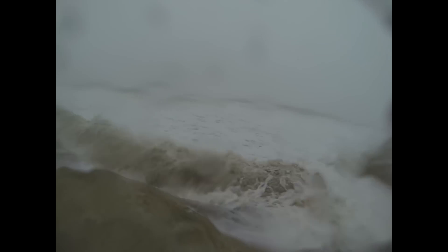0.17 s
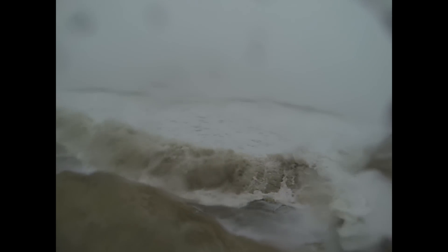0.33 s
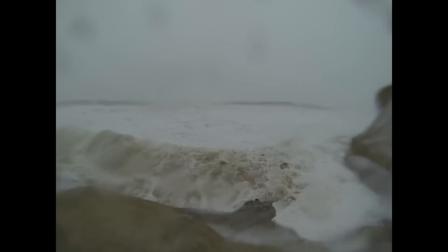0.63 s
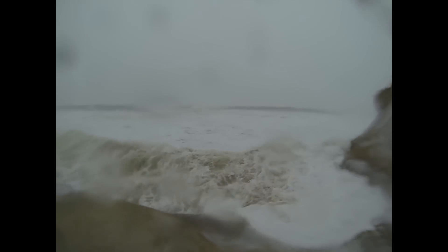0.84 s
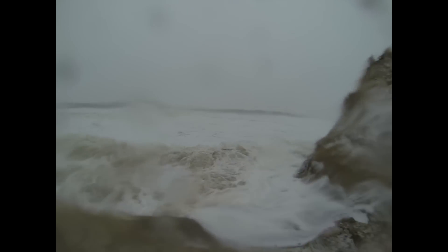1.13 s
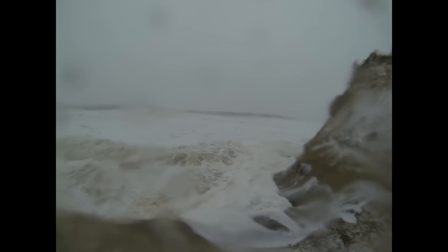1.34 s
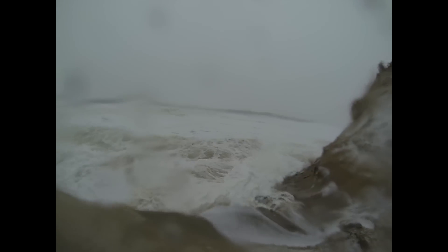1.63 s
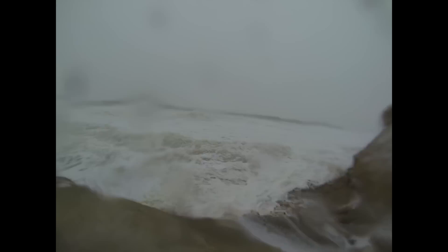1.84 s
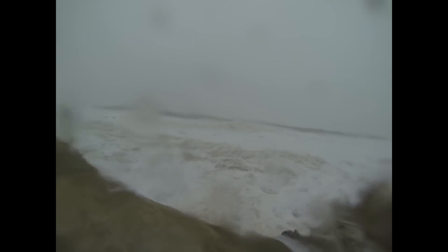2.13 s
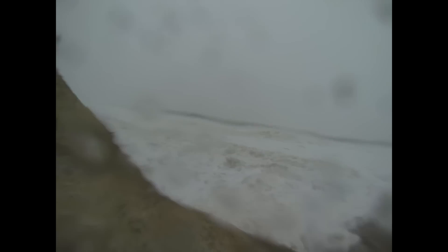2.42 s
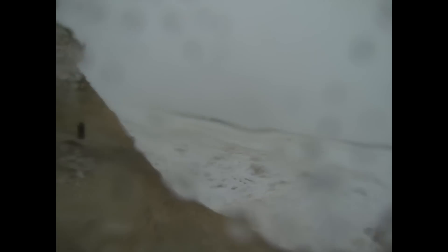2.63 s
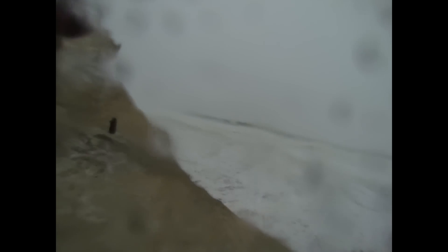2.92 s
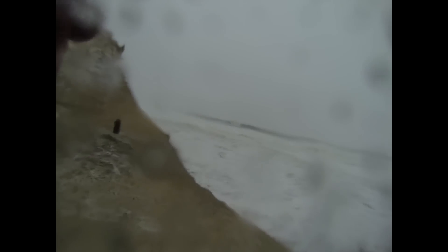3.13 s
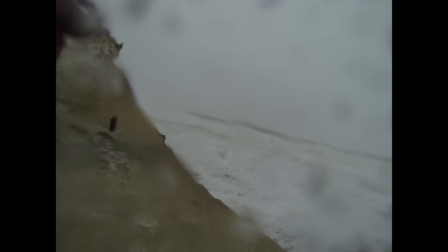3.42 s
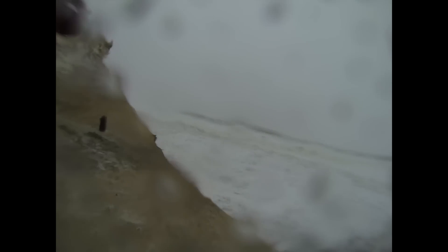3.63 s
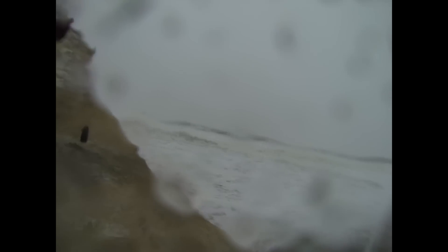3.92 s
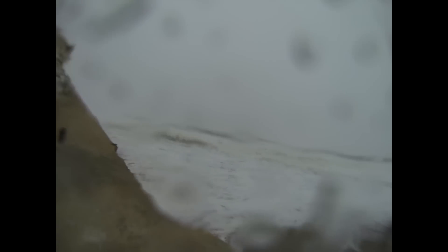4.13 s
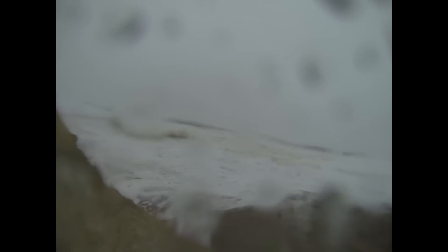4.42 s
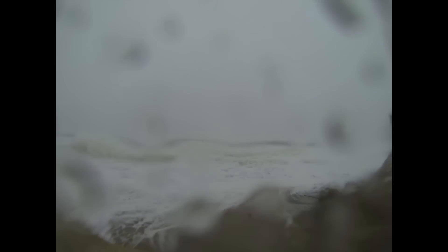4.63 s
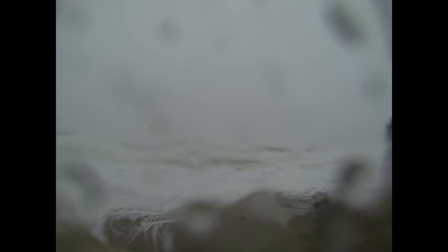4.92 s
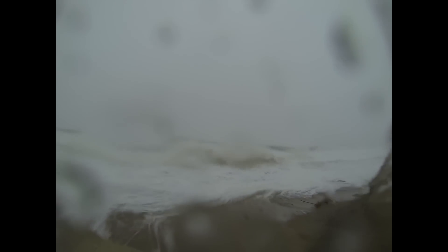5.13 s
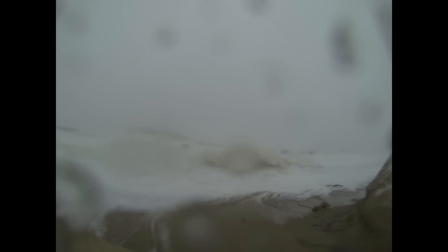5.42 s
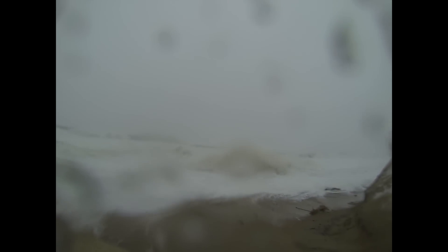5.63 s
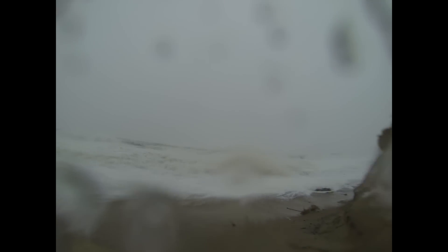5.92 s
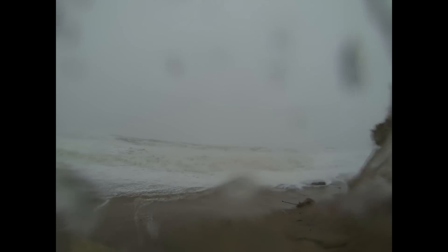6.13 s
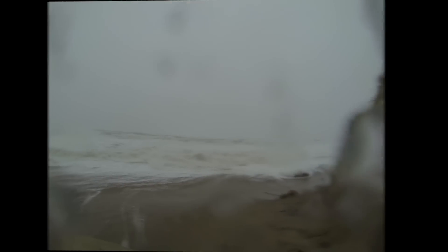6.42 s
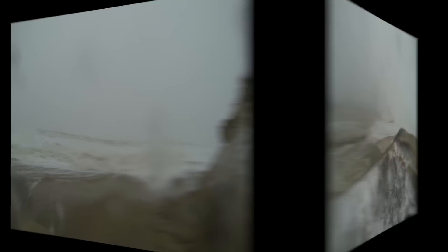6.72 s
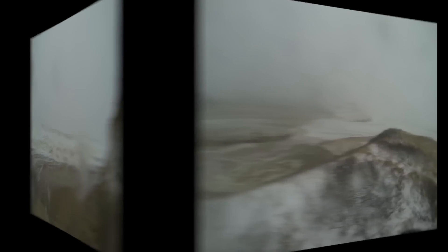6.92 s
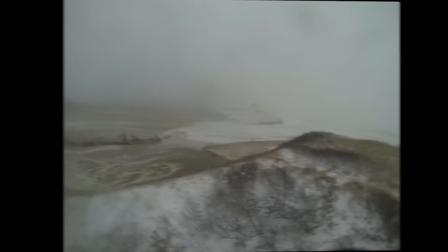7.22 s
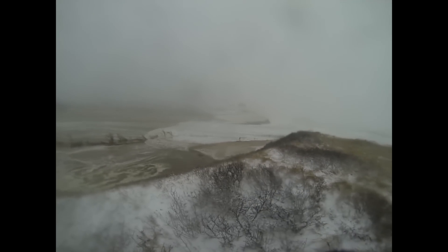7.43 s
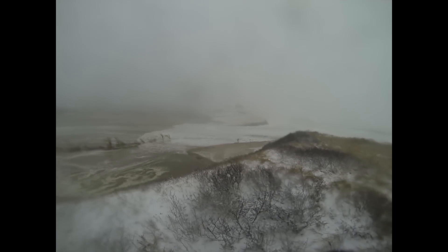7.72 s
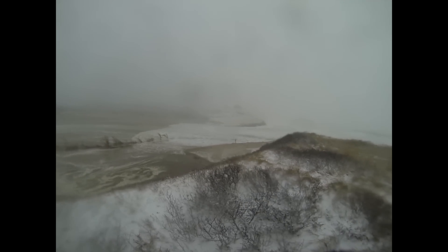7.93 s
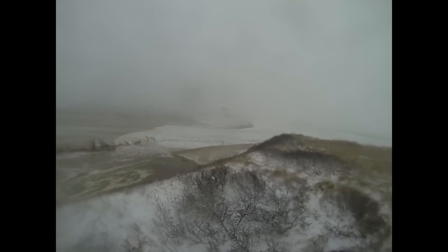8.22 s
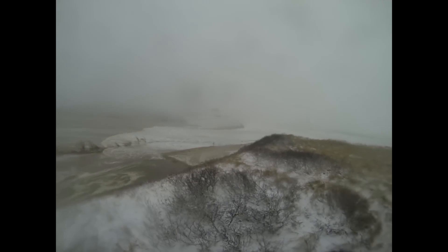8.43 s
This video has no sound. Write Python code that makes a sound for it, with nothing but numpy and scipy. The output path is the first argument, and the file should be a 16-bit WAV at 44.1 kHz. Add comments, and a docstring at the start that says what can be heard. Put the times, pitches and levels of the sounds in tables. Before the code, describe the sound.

Close, exposed outdoor microphone in a gale: bassy, lumpy wind noise and short bursts of airy roar. Hard bright ticks and fine patter strike the plastic shell, first in loose clusters, then a dense rattling spell near the three-second mark, then sparse isolated taps. Rough surf stays behind as a boxy wash with faint steady hiss. No voices.

```python
"""Storm on a beach

A small hand-held camera hears gusts buffet its microphone port: rumble, throb and flutter of shaped noise.
Blown spray and sleet tick on the plastic housing, as lone hard pellets and as a fine patter that thickens
in short puffs; each hit is a noise burst ringing the housing modes, and heavy drops add a dull thud.
Behind them surf roars, as noise lifted at the housing resonances, over a steady hiss of far foam."""
import sys
import numpy as np
from scipy import signal
from scipy.fft import rfft, irfft
from scipy.io import wavfile

SR = 44100
rng = np.random.default_rng(int(sys.argv[2]) if len(sys.argv) > 2 else 0)


def linear_from_db(decibels):
    """Turn decibels (scalar or array-like) into linear amplitude factors; 0 gives 1."""
    return 10 ** (np.asarray(decibels, float) / 20)


def inscribe(sig):
    """Save sig as 16-bit PCM at rate SR to the path in sys.argv[1].

    A 1-D sig is mono; a 2-D sig holds one channel per row.
    Samples are clipped to [-1, 1] before scaling.
    """
    pcm = np.round(np.clip(np.atleast_2d(sig).T, -1, 1) * 32767)
    wavfile.write(sys.argv[1], SR, pcm.astype(np.int16))


N = 377496


def rms_one(x):
    """Scale to rms 1."""
    return x / np.sqrt(np.mean(x ** 2) + 1e-20)


def in_time(rows):
    """Columns of a curve table, one value per sample."""
    s, *columns = np.transpose(rows)
    return [np.interp(np.arange(N) / SR, s, column) for column in columns]


def at_hz(points, hz):
    """Read a spectrum on a log-frequency axis."""
    point_hz, level_db = np.transpose(points)
    return np.interp(np.log(hz), np.log(point_hz), level_db)


def drift(rate_hz):
    """Slow random wander of spread 1: noise twice through a one-pole low-pass at rate_hz."""
    step = 40     # samples between computed points
    pole = np.exp(-2 * np.pi * rate_hz * step / SR)
    noise = rng.standard_normal(N // step + 2002)
    slow = signal.lfilter([1], [1, -2 * pole, pole * pole], noise)[2000:]     # drop the settling start
    return np.interp(np.arange(N) / step, np.arange(len(slow)), rms_one(slow))


def coloured(spectrum):
    """Noise with the given spectrum, rms 1."""
    hz = np.maximum(np.arange(N // 2 + 1) * SR / N, 1)
    white = rfft(rng.standard_normal(N))
    return rms_one(irfft(white * linear_from_db(at_hz(spectrum, hz)), N))


def resonate(x, hz, width_hz):
    """Two-pole resonance; a unit click rings with height about 1."""
    r, w = np.exp(-np.pi * width_hz / SR), 2 * np.pi * hz / SR
    return signal.lfilter([0, np.sin(w)], [1, -2 * r * np.cos(w), r * r], x + 1e-18)


# short puffs that fling a sheet of spray at the camera: middle_s, length_s, flutter_db, roar_db, patter_db
PUFFS = [(0.05, 0.14, -60, -50.5, -58.5), (0.208, 0.059, -55, -56, -54), (0.432, 0.086, -60, -49, -50),
         (0.656, 0.18, -39.5, -43.5, -44.5), (0.863, 0.18, -35.5, -42.5, -54),
         (1.482, 0.091, -62, -63, -53.5), (1.702, 0.062, -48, -53, -58), (2.018, .12, -43.5, -47, -47),
         (2.124, 0.038, -49, -42, -47), (2.409, 0.048, -38, -48, -36.5), (2.559, 0.13, -48, -46.5, -36),
         (2.863, 0.16, -36, -42.5, -34.5), (2.99, 0.062, -37, -47, -42), (3.192, 0.12, -56, -45, -39),
         (3.27, .12, -37.5, -42.5, -43.5), (3.39, 0.088, -47.5, -47.5, -50),
         (3.713, 0.067, -42, -50.5, -53), (3.816, 0.046, -46, -43, -42), (3.906, 0.088, -39, -45, -42.5),
         (4.058, 0.21, -50.5, -56, -50.5), (4.194, 0.091, -61, -52, -59.5), (4.348, 0.053, -54, -72, -53),
         (4.503, 0.045, -61, -60, -54.5), (4.707, .06, -53, -59, -63), (4.767, 0.037, -49, -56, -57.5),
         (4.845, 0.051, -53, -57, -57.5), (5.728, 0.16, -43.5, -52, -70.5), (5.982, 0.15, -47, -58, -67),
         (6.099, 0.13, -45, -52, -61), (6.283, 0.13, -45.5, -51.5, -74), (6.423, 0.081, -39.5, -48.5, -77),
         (6.546, 0.076, -46, -52.5, -74), (6.688, 0.23, -43.5, -51, -58.5), (7.002, 0.094, -50.5, -57, -63),
         (7.164, 0.13, -50, -51.5, -60.5), (7.636, 0.12, -42, -49.5, -59.5),
         (7.858, 0.075, -55, -54, -55.5), (7.97, 0.064, -42, -48, -56), (8.049, 0.11, -45.5, -51.5, -56.5),
         (8.374, .05, -51, -53.5, -73), (8.482, 0.075, -45, -49.5, -58.5)]


def puffed(slow_db, column):
    """Add the power of each puff, a raised-cosine swell, to a slow level."""
    t, power = np.arange(N) / SR, linear_from_db(2 * slow_db)
    for row in PUFFS:
        middle_s, length_s = row[:2]
        phase = np.pi * np.clip((t - middle_s) / (2 * length_s), -.5, .5)
        power = power + linear_from_db(2 * row[column]) * np.cos(phase) ** 4
    return 10 * np.log10(power)


# slow strength of the wind on the port: start_s, flutter_db, rumble_db
GUST = [(0.0, -51.5, -34), (0.62, -52, -28), (0.76, -43, -33), (0.9, -47, -23), (1.26, -56.5, -33.5),
        (1.91, -54, -38.5), (2.14, -52, -32.5), (2.17, -47, -35.5), (2.79, -42, -30.5), (2.95, -49, -22),
        (3.07, -36, -32), (3.27, -55, -21), (3.43, -53, -29.5), (3.65, -54, -43), (3.86, -42.5, -29),
        (4.05, -53, -41), (4.27, -54, -35.5), (5.2, -54, -40.5), (5.58, -49, -34.5), (6.56, -49.5, -33),
        (6.6, -51, -44), (6.75, -53, -31), (6.94, -52.5, -41), (7.22, -55, -33.5), (7.48, -58.5, -39),
        (7.68, -56, -28), (7.87, -48.5, -32), (8.08, -53, -31), (8.34, -59, -44), (8.56, -55, -37)]
# wind noise spectra, each pitch_hz, level_db (per Hz, relative)
RUMBLE = [(8, 3.5), (25, 3.5), (40, 8.5), (67, -17.5), (110, -27), (200, -27.5), (2000, -140)]
THROB = [(30, -30), (60, 7.5), (90, -1.5), (140, -15.5), (300, -58), (2000, -140)]
FLUTTER = [(50, -4.5), (100, 1), (200, -5.5), (400, -17), (700, -36.5), (1500, -46), (8000, -120)]
BUFFET_DB, BUFFET_RATE_HZ = 1.5, 9.0     # the gust comes in lumps


def wind():
    """Eddies over the port: deep rumble, faster flutter, and between them a throb that needs both."""
    flutter_db, rumble_db = in_time(GUST)
    lumps_db = BUFFET_DB * drift(BUFFET_RATE_HZ)
    rumble_db = rumble_db + lumps_db
    flutter_db = puffed(flutter_db + 0.24 * lumps_db, column=2)
    rumble = linear_from_db(rumble_db) * coloured(RUMBLE)
    throb = linear_from_db((rumble_db + flutter_db) / 2 - 2.5) * coloured(THROB)
    flutter = linear_from_db(flutter_db) * rms_one(linear_from_db(0.99 * drift(15.5)) * coloured(FLUTTER))
    return rumble + throb + flutter


# housing resonances: pitch_hz, width_hz, level_db (relative, how readily a hit rings the mode)
HOUSING = [(837, 156, -32), (1554, 326, -1), (2080, 650, 4), (3540, 592, 4.5), (4865, 690, 7),
           (6306, 337, -2.5), (7470, 585, 2), (10560, 980, -17), (10300, 400, -28.5), (11990, 5200, 8),
           (14200, 1200, -24)]


def strike(at, peak_db, colour_db, scatter_db, contact_s):
    """Each impact is a short crumbling burst that rings every housing mode with a strength of its own."""
    taps = np.arange(96)
    # contact varies from hit to hit: wet drops splat longer than ice
    lasts_s = contact_s * linear_from_db(4.7 * rng.standard_normal((len(at), 1)))
    burst = rng.standard_normal((len(at), len(taps))) * np.exp(-taps / (lasts_s * SR))
    luck_db = scatter_db * rng.standard_normal((len(at), len(HOUSING)))
    least_drive = .5 * np.sqrt(np.sum(burst ** 2, axis=1))
    out = np.zeros(N)
    for k, (hz, width_hz, level_db) in enumerate(HOUSING):
        drive = np.abs(burst @ np.exp(2j * np.pi * hz * taps / SR))     # how hard the burst drives this mode
        drive = np.maximum(drive, least_drive)
        gain = linear_from_db(peak_db + level_db + colour_db(hz) + luck_db[:, k]) / drive
        force = np.bincount((at[:, None] + taps).ravel(), (gain[:, None] * burst).ravel(), N + len(taps))
        out += (-1) ** k * resonate(force[:N], hz, width_hz)     # neighbouring modes in opposite sign
    return out


# lone hard pellets: start_s, body_db (peak of the body modes), pitch_hz (the body modes gather round it),
# treble_db (peak of the treble modes)
PELLETS = [(0.0192, -13, 1990, -26), (0.0443, -16.5, 4160, -21), (0.1088, -23.5, 1580, -47),
           (0.1837, -26, 2380, -32.5), (0.315, -40, 3060, -44), (0.414, -16.5, 3700, -22),
           (0.433, -12.5, 3500, -23), (0.466, -20.5, 3700, -31), (0.49, -21, 2500, -19),
           (0.5296, -25, 3450, -27), (0.555, -21, 2810, -28), (0.579, -20, 3720, -26),
           (0.6419, -11.5, 2120, -18.5), (0.6847, -13, 1890, -18), (0.703, -25, 3080, -13.5),
           (0.7756, -26, 3040, -20), (0.8078, -21, 3800, -24), (0.842, -18, 3700, -21),
           (0.9526, -26, 2760, -25.5), (1.0035, -25, 3800, -26.5), (1.328, -30, 1950, -35),
           (1.4443, -25, 3380, -28), (1.459, -24, 3860, -40), (1.553, -29, 2760, -29),
           (1.5706, -12, 3500, -17), (1.592, -28, 2940, -49), (1.651, -19, 3620, -39),
           (1.73, -24, 1760, -48), (1.9124, -28, 3050, -24), (1.941, -25, 3600, -18),
           (1.9596, -20.5, 3450, -43), (1.9794, -16.5, 3670, -21), (2.0449, -7.5, 3800, -12.5),
           (2.0578, -12.5, 3820, -21), (2.0617, -8, 2900, -15), (2.2274, -13, 3770, -39),
           (2.2662, -12.5, 3180, -21), (2.2784, -8.5, 2090, -40), (2.349, -15.5, 3880, -25),
           (2.3715, -15.5, 4040, -30), (2.4122, -16.5, 3840, -21), (2.5853, -14, 4060, -24),
           (2.662, -13, 2340, -15.5), (2.689, -15.5, 2560, -12), (2.7206, -14, 2340, -15.5),
           (2.76, -14, 2500, -4.5), (2.8018, -15, 3890, -10), (3.0063, -14, 4080, -21),
           (3.0685, -15.5, 3140, -9.5), (3.144, -14, 3600, -18.5), (3.198, -13.5, 2640, -8.5),
           (3.2815, -12, 2750, -17), (3.3179, -14, 2900, -15), (3.4288, -32, 2320, -29),
           (3.5335, -25, 3030, -37), (3.5783, -9, 2450, -20), (3.658, -14.5, 2480, -20),
           (3.6727, -16, 2470, -20), (3.7397, -17.5, 1970, -32), (3.7625, -20, 2500, -39),
           (3.7958, -24, 3050, -21), (3.81, -25, 2500, -21), (4.0383, -35, 2460, -27.5),
           (4.165, -14.5, 2560, -39), (4.2153, -22.5, 2230, -25), (4.2752, -13.5, 3520, -38),
           (4.321, -28, 3800, -47), (4.4205, -27, 2640, -47), (4.658, -36.5, 1900, -34.5),
           (4.7677, -25, 2360, -42), (4.9117, -32, 3100, -36), (5.545, -31.5, 3970, -45),
           (5.6582, -25.5, 1760, -35), (6.354, -18.5, 2660, -33), (7.1446, -25, 2360, -49),
           (7.5219, -27.5, 4730, -38), (7.9809, -21.5, 2720, -30), (8.3725, -29.5, 2010, -37.5),
           (8.452, -18.5, 1480, -35)]
TREBLE_FROM_HZ = 5500
OFF_PITCH_DB_PER_OCTAVE = 14     # body modes far from a pellet's pitch speak less


def pellets(rows):
    """Hard hits; where a pellet lands decides its pitch in the body and how much treble it wakes."""
    s, body_db, pitch_hz, treble_db = np.transpose(rows)
    mode_hz, _, level_db = np.transpose(HOUSING)
    body = mode_hz < TREBLE_FROM_HZ

    def off_db(hz):
        return -OFF_PITCH_DB_PER_OCTAVE * np.abs(np.log2(hz / pitch_hz))

    body_power = sum(linear_from_db(2 * (db + off_db(hz))) for hz, db in zip(mode_hz[body], level_db[body]))
    body_sum_db = 10 * np.log10(body_power)
    treble_sum_db = 10 * np.log10(np.sum(linear_from_db(2 * level_db[~body])))

    def colour_db(hz):
        if hz < TREBLE_FROM_HZ:
            return body_db + off_db(hz) - body_sum_db
        return treble_db - treble_sum_db

    at = np.round(s * SR).astype(int)
    wait = (rng.uniform(.003, .012, len(at)) * SR).astype(int)
    later = np.minimum(at + wait, N - 1)     # a splinter falls back
    hits = strike(at, 0, colour_db, scatter_db=1.5, contact_s=0.00043)
    splinters = strike(later, -26.5, colour_db, scatter_db=4.5, contact_s=0.00028)
    return hits + splinters


CANDIDATE_STRAYS_PER_S = 160
STRAY_SHARE, STRAY_CLUMP_DB = .4, 6.0     # share that lands, and how much they bunch
STRAY_DB, STRAY_SPREAD_DB = -39.5, 3     # smallest stray at average patter, and size scale above it
STRAY_FOLLOWS = 0.76     # dB per dB of patter


def strays(patter_db):
    """Smaller pellets in random bunches, harder where the spray is thick; rows as in PELLETS."""
    at = np.flatnonzero(rng.random(N) < CANDIDATE_STRAYS_PER_S / SR)
    size, pitch, bright, luck = rng.random((len(at), 4)).T
    db = STRAY_DB + STRAY_FOLLOWS * (patter_db[at] - patter_db.mean())
    db = db - STRAY_SPREAD_DB * np.log(1 - .95 * size)
    lands = luck < STRAY_SHARE * linear_from_db(STRAY_CLUMP_DB * drift(15.0))[at]
    db = np.where(lands, db, -np.inf)
    return np.transpose([at / SR, db, 1700 * 2 ** (1.3 * pitch), db - 17.3 * bright])


CANDIDATE_DROPS_PER_S = 3000
PATTER_SPREAD_DB = 6.5     # scale of the exponential drop sizes
DENSEST_AT_DB, THINNING = -44, 0.64     # below this level the drop rate falls, THINNING dB (20 log10) per dB


def patter(patter_db):
    """Fine spray: small hits in clumps, a dense fizz in the gusts and scattered ticks between them."""
    at = np.flatnonzero(rng.random(N) < CANDIDATE_DROPS_PER_S / SR)
    share = np.clip(linear_from_db(THINNING * (patter_db - DENSEST_AT_DB)), .02, 1)
    lands = rng.random(len(at)) < (share * linear_from_db(4.0 * drift(20)))[at]
    size_db = PATTER_SPREAD_DB * np.minimum(rng.exponential(1, len(at)), 3.0)
    lean_db = 2.0 * rng.standard_normal(len(at))     # brighter or duller, per octave

    def colour_db(hz):
        return (lean_db - 0.2) * np.log2(hz / 4000)

    hits = strike(at, np.where(lands, size_db, -np.inf), colour_db, scatter_db=1.0, contact_s=0.000078)
    even = hits / np.sqrt(share)     # sparse drops made stronger, so density alone does not set the level
    return linear_from_db(patter_db) * rms_one(even)


# heavy drops that also shake the whole camera: start_s, ring_db (lowest housing mode), thud_db
HEAVY = [(1.7305, -38, -23), (2.2666, -36, -50), (3.5782, -39, -42), (4.2751, -36, -38),
         (6.3557, -32.5, -45), (8.4521, -26.5, -38)]
THUD_HZ, THUD_WIDTH_HZ = 296, 480


def heavy_drops():
    """A soft blow rings the lowest housing mode and a dull thud."""
    s, ring_db, thud_db = np.transpose(HEAVY)
    at = np.round(s * SR).astype(int)
    lowest_hz, lowest_width_hz, _ = HOUSING[0]
    ring = resonate(np.bincount(at, linear_from_db(ring_db), N), lowest_hz, lowest_width_hz)
    thud = resonate(np.bincount(at, linear_from_db(thud_db), N), THUD_HZ, THUD_WIDTH_HZ)
    return ring - thud


# surf spectrum, before the resonances are lifted out of it: pitch_hz, level_db (per Hz, relative)
ROAR = [(180, -3), (300, 12.5), (1060, 6.5), (1560, 8.5), (2700, 2.5), (3640, 2), (5700, -14),
        (13100, -31.5), (16000, -55)]


def surf(roar_db, lift_db=18.0):
    """Broad roar heard through the housing, whose resonances stand out of it; it swells a little."""
    hz = np.arange(N // 2 + 1) * SR / N
    lift = 1     # in power, the same for every resonance
    for mode_hz, width_hz, _ in HOUSING:
        lift = lift + linear_from_db(2 * lift_db) / (1 + (2 * (hz - mode_hz) / width_hz) ** 2)
    roar = irfft(rfft(coloured(ROAR)) * np.sqrt(lift), N)
    rough_db = 0.13 * (roar_db - roar_db.min()) * drift(97)     # strong gusts tear the roar into grain
    return linear_from_db(roar_db + 0.78 * drift(22) + rough_db) * rms_one(roar)


# far foam as it sounds through the housing: pitch_hz, level_db (per Hz, relative)
HISS = [(1000, -35), (1700, -8), (3000, -8), (4800, -0.5), (5800, -3), (7600, 1), (9200, -12), (10700, -1),
        (12000, -17), (13300, 1), (14800, -25), (16500, -40)]


def far_foam():
    """Countless far bubbles blur into a steady hiss of shaped noise."""
    return linear_from_db(-73) * coloured(HISS)


# slow level of blown spray and surf: start_s, patter_db, roar_db
STORM = [(0.0, -62.5, -53), (0.4, -61.5, -53.5), (0.62, -58, -54), (0.78, -46.5, -50), (1.0, -64, -53),
         (1.26, -66.5, -57.5), (1.96, -62.5, -56), (2.12, -43.5, -49), (2.79, -44.5, -43.5),
         (3.17, -50, -50), (3.41, -63, -57.5), (3.55, -63, -57), (3.98, -54.5, -55.5), (4.51, -67, -56.5),
         (5.31, -77.5, -56.5), (6.32, -66.5, -55.5), (7.44, -75.5, -60.5), (7.82, -68, -51),
         (8.3, -77, -68), (8.56, -61, -54)]
SHEET_DB, SHEET_RATE_HZ = 3.0, 17.4     # the spray is uneven
ROAR_FOLLOWS_SHEETS = 0.31     # dB per dB
QUIETEST_SURF_DB = -60.5     # floor of the slow curve: the surf never falls silent


def scene():
    """Wind, everything that strikes the housing, surf and far foam."""
    patter_db, roar_db = in_time(STORM)
    sheets_db = SHEET_DB * drift(SHEET_RATE_HZ)
    patter_db = puffed(patter_db, column=4) + sheets_db
    roar_db = puffed(np.maximum(roar_db, QUIETEST_SURF_DB), column=3) + ROAR_FOLLOWS_SHEETS * sheets_db
    air = wind() + surf(roar_db) + far_foam()
    hits = patter(patter_db) + pellets(strays(patter_db)) + pellets(PELLETS)
    low_cut = signal.butter(2, 620, "high", fs=SR, output="sos")     # the hits carry little bass below about 620 Hz
    return (air + heavy_drops() + signal.sosfilt(low_cut, hits))[None]


def band_limit(x):
    """A steep low-pass at the top of the band."""
    return signal.sosfilt(signal.butter(12, 16570, fs=SR, output="sos"), x)


def record(dry):
    """The microphone capsule rolls off in the top octave, then a steep filter cuts the very top."""
    rolled = signal.sosfilt(signal.butter(2, 13500, fs=SR, output="sos"), dry)
    cut = signal.sosfilt(signal.cheby2(10, 60, 16800, fs=SR, output="sos"), rolled)
    return band_limit(cut)


dry = scene()
out = record(dry)
inscribe(out)
```